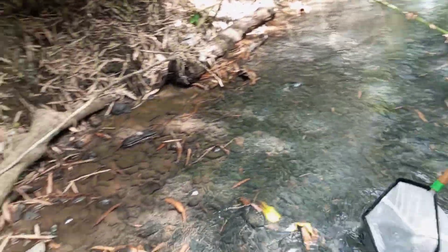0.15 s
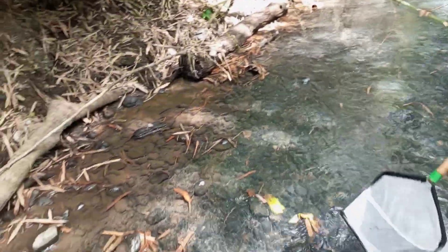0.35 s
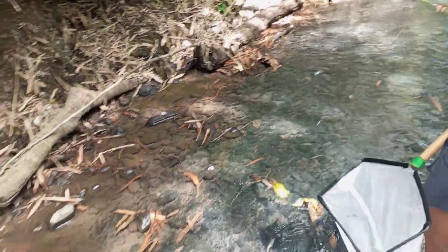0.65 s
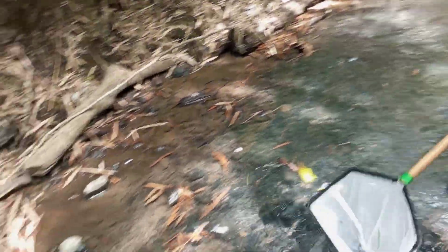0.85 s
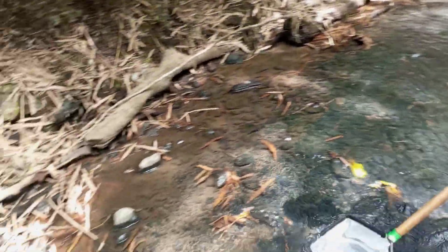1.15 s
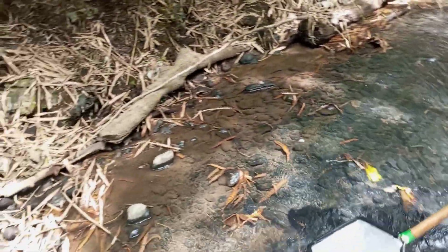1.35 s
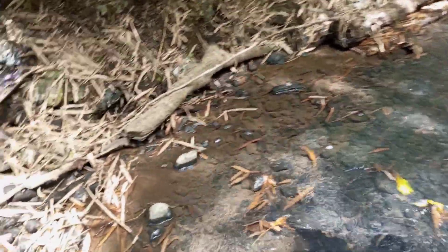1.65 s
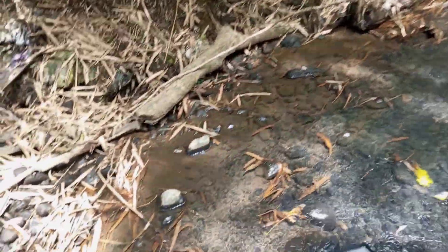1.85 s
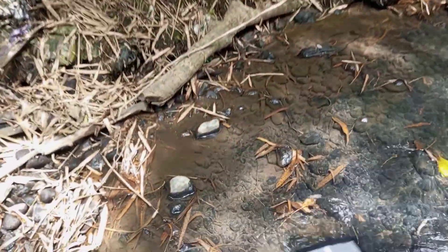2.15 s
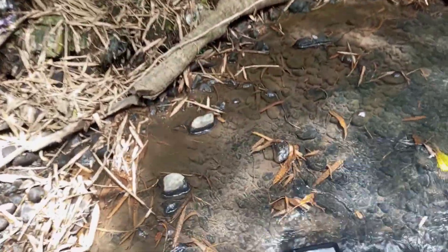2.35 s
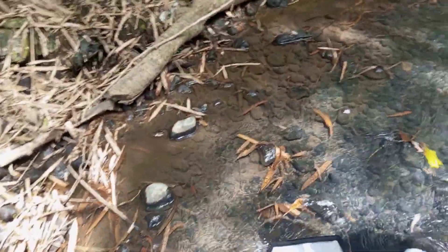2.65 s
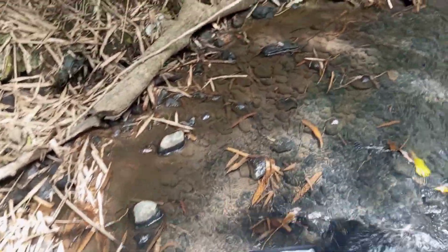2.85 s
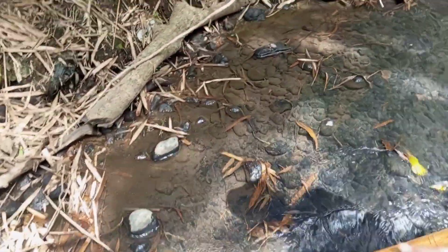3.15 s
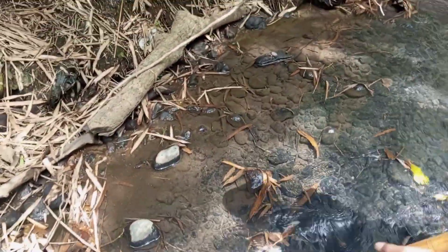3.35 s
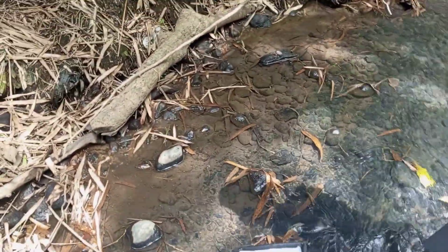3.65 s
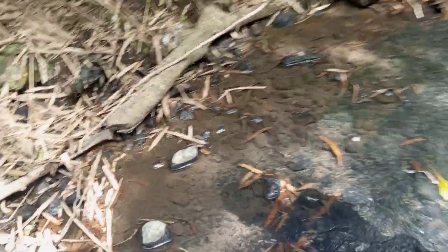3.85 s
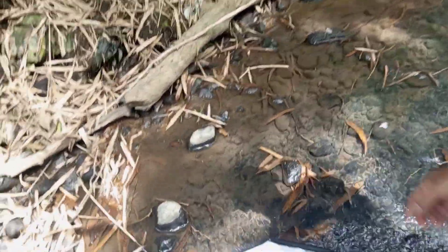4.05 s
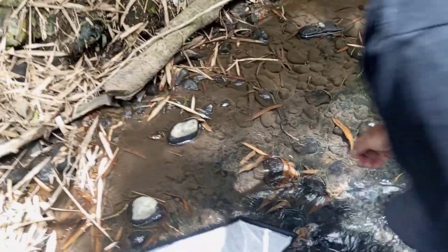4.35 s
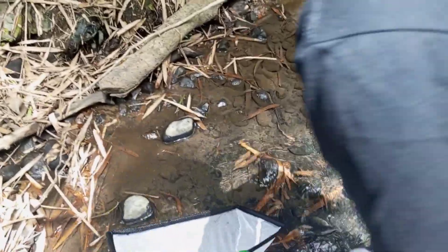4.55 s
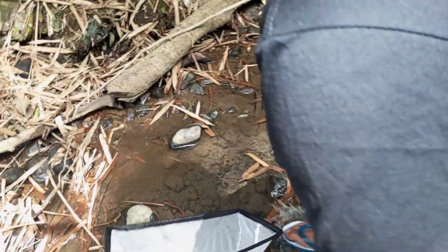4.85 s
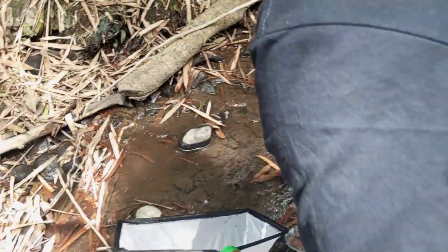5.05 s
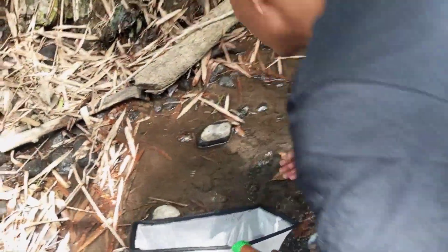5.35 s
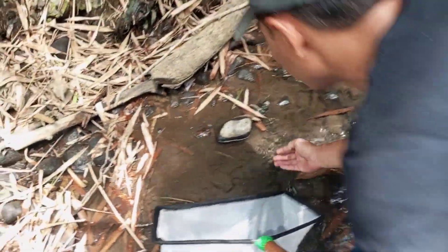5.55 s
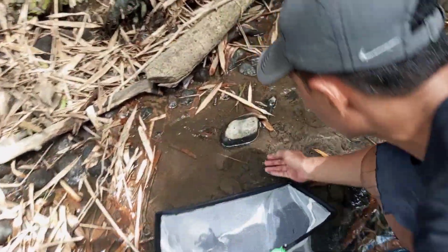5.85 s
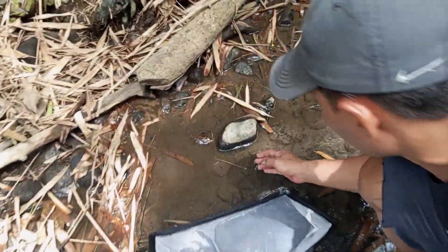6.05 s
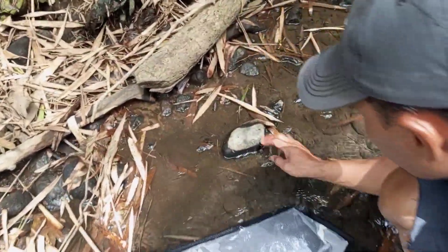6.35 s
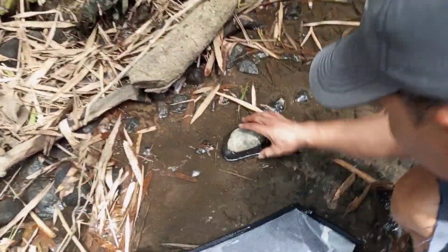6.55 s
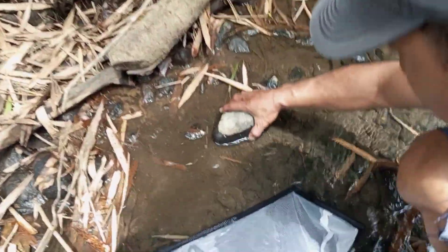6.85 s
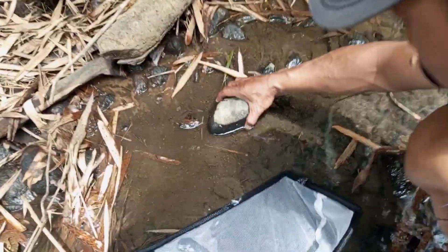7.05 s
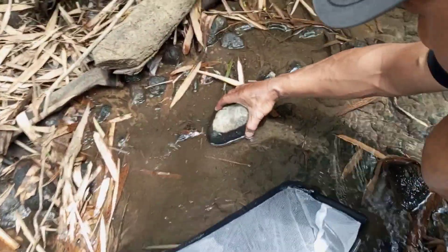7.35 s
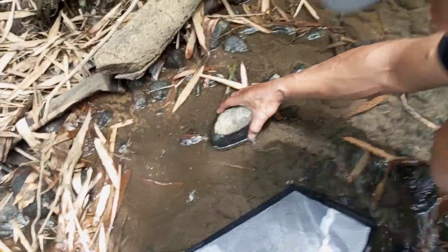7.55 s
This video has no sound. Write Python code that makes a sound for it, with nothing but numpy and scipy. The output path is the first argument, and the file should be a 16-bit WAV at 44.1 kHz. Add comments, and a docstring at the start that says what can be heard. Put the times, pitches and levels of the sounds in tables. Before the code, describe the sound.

Close, irregular wading steps slosh through the shallows of a stream among trees, each with plops, drips and a brief fizz. A bird nearby chirps twice at the start, once midway and twice more as the wading stops, each note short and falling. For the last two seconds there is mostly the soft, steady hiss of the water, with smaller birds barely audible far away.

```python
"""A stream hisses throughout. First a near bird gives two falling chirps that echo in the trees.
Then someone wades through the shallows with a hand net: each step traps air pockets that resonate as
bubbles, throws spray and leaves a fizz. The bird chirps once amid the steps and twice as they end,
after five seconds. Last, smaller birds call far off, heard by their reverberation alone."""
import sys
import numpy as np
from scipy import signal
from scipy.fft import rfft, irfft, next_fast_len
from scipy.io import wavfile
from scipy.ndimage import uniform_filter1d, map_coordinates

SR = 44100
rng = np.random.default_rng(int(sys.argv[2]) if len(sys.argv) > 2 else 0)


def wav_out(sig):
    """Save sig, one row per channel (or a flat mono array), as 16-bit PCM at SR to the path in sys.argv[1]."""
    wavfile.write(sys.argv[1], SR, np.round(np.clip(np.atleast_2d(sig).T, -1, 1) * 32767).astype(np.int16))


N = 339570


def wading():
    """Superposition: single bubbles and drops stand out of the gurgle and spray that the legs stir up."""
    rings, slaps = drop_impacts()
    gurgle_db, spray_db = stirring()
    gurgle = amp(gurgle_db - 9.5) * bubble_cloud(4500, hz=1200, spread=.55, cycles=30, scatter_db=1.1)
    droplet_db = 1.576 * spray_db + 27.5  # droplets grow faster than foam with harder stirring
    droplets = amp(droplet_db) * bubble_cloud(2200, hz=5200, spread=.3, cycles=30, scatter_db=1.6)
    return air_pockets() + rings + gurgle + droplets + spray(spray_db, slaps + sloshes())


def bubble(hz, t60, rise, attack):
    """Minnaert resonance: trapped air rings as a damped sine, its pitch climbing as it nears the surface."""
    age = np.arange(int(t60 * SR) + 2) / (t60 * SR)
    envelope = (1 - np.exp(-(age / attack) ** 2)) * amp(-60 * age)
    return np.sin(2 * np.pi * hz * t60 * age * (1 + rise * age)) * envelope / envelope.max()


def air_pockets():
    """Free oscillation: each air pocket closed by a foot or the net rings at its natural frequency."""
    # bubbles (time [s], peak level [dB], pitch [Hz], t60 [s])
    pockets = [(.149, -49.5, 1236, 0.057), (.155, -57.5, 497, 0.15), (.367, -46.5, 1210, 0.015),
               (.81, -48.5, 2200, 0.014), (0.893, -53, 340, .042), (.957, -50.5, 1430, 0.027),
               (.958, -56.5, 3370, 0.037), (.998, -50, 352, .026), (.999, -46.5, 3150, 0.0068),
               (1.016, -54, 1235, 0.042), (1.074, -47, 2330, 0.021), (1.162, -47, 1740, 0.0093),
               (1.256, -45, 3050, 0.0043), (1.265, -35.5, 1850, 0.0074), (1.275, -27, 366, 0.051),
               (1.317, -54, 560, 0.062), (1.335, -54.5, 680, 0.045), (1.729, -42.5, 780, 0.051),
               (1.732, -43, 2490, 0.011), (1.743, -41.5, 1180, 0.026), (1.752, -24.5, 1780, 0.0048),
               (1.771, -47, 2720, .016), (1.784, -50, 836, .048), (1.787, -27, 2670, 0.01),
               (1.789, -36.5, 1520, 0.0098), (1.905, -47.5, 1520, .046), (2.169, -52, 837, 0.067),
               (2.33, -40, 976, .038), (2.345, -23, 1554, 0.011), (2.378, -41.5, 2170, .014),
               (2.407, -42, 2270, .009), (2.409, -38.5, 1410, .012), (2.428, -42.5, 1770, 0.019),
               (2.43, -51, 710, 0.041), (2.534, -46.5, 1805, .042), (2.776, -46.5, 2180, 0.024),
               (2.796, -51, 2220, .02), (2.925, -52, 625, 0.051), (2.979, -39, 326, 0.069),
               (2.98, -45.5, 990, .018), (3.002, -49, 930, 0.038), (3.099, -49.5, 2070, .018),
               (3.13, -42.5, 2070, 0.021), (3.331, -41, 2100, .019), (3.407, -51.5, 696, 0.036),
               (3.539, -49, 441, .13), (3.568, -40, 1004, .018), (3.575, -45, 610, .031),
               (3.58, -41, 357, 0.077), (3.62, -41.5, 2590, .01), (3.621, -44.5, 2050, 0.02),
               (3.633, -44.5, 1640, .024), (3.652, -26.5, 377.6, 0.05), (3.678, -49, 1186, .044),
               (3.693, -45, 2530, .012), (3.704, -50, 1116, 0.036), (3.713, -46.5, 1596, .025),
               (3.719, -50, 456, 0.034), (3.763, -47, 1420, .023), (3.798, -44.5, 1340, 0.032),
               (3.815, -44, 1570, .017), (3.821, -55, 594, 0.14), (3.842, -48, 1236, 0.067),
               (3.86, -34.5, 1730, 0.011), (3.873, -52, 1830, .028), (3.892, -48, 433, 0.053),
               (3.925, -42, 1305, .011), (3.943, -47, 1130, .018), (3.946, -43, 1710, .013),
               (3.958, -45, 1890, .012), (4.039, -56.5, 500, .072), (4.576, -48, 1590, 0.019),
               (4.612, -41.5, 424, 0.045), (4.627, -41, 370, 0.087), (4.631, -46, 1084, .034),
               (4.646, -47.5, 1050, 0.053), (4.665, -44, 1400, .017), (4.682, -53, 423, .074),
               (4.694, -55, 632, 0.15), (4.732, -45.5, 660, 0.033), (4.748, -49, 1040, .029),
               (4.754, -42.5, 228, 0.054), (4.767, -47.5, 406, 0.13), (4.771, -49, 2060, 0.013),
               (4.786, -36.5, 2080, 0.0077), (4.805, -52, 1580, 0.028), (4.806, -46, 976, 0.039),
               (4.826, -45, 1200, .014), (4.875, -50, 3010, .014), (4.882, -43.5, 788, 0.068),
               (4.891, -46, 1300, 0.017), (4.904, -44, 2100, .009), (4.93, -48, 910, .026),
               (4.986, -51, 1750, 0.043), (5.004, -40.5, 2850, 0.0059), (5.009, -47, 710, .08),
               (5.018, -47, 2930, .01), (5.051, -51, 740, 0.037), (5.093, -51, 2520, .016),
               (5.167, -51, 934, 0.07), (5.184, -53, 375, .039), (6.161, -56, 240, 0.034),
               (7.374, -55.5, 718, 0.036), (7.375, -54.5, 435, .026), (7.675, -57, 387, .077)]
    out = np.zeros(N)
    for s, db, hz, t60 in pockets:
        add(out, s, amp(db) * bubble(hz, max(t60, .005), rise=.12, attack=.1))
    return out


def drop_impacts():
    """Impact excitation: a drop makes a broadband slap and a ring, which is shorter under a harder slap."""
    # drops hitting the water (time [s], peak level [dB], ring pitch [Hz], slap re ring [dB])
    drops = [(.33, -50, 5470, 4), (.515, -50.5, 8100, 3), (0.605, -50, 4900, 3), (.8127, -36.5, 7200, -6),
             (.96, -51, 5100, 1), (0.999, -55, 7000, 2), (1.0135, -54, 8500, 0), (1.029, -53, 8450, 0),
             (1.0848, -49.5, 4700, -14), (1.1603, -45, 5760, 1), (1.1737, -48, 4930, 0),
             (1.2436, -47, 6100, -4), (1.2537, -54, 5600, 6), (1.6104, -48, 5900, -12),
             (1.705, -45, 4320, 0), (1.7145, -47, 4700, -10), (1.725, -49, 5900, -10),
             (1.7548, -32, 4000, -5), (1.7629, -35, 4200, -1), (1.7713, -36, 6370, -10),
             (1.7838, -35, 5930, 7), (1.7916, -25, 4800, -1.5), (1.798, -38, 9800, -11),
             (1.809, -38, 4270, -5), (1.8188, -42, 4100, 2), (1.8265, -38, 5860, -6),
             (2.3056, -38.5, 6200, -10), (2.3271, -28, 6600, -1.5), (2.3273, -31.5, 5650, 7),
             (2.345, -29.5, 6260, 1.5), (2.358, -43, 4700, -8), (2.4098, -31, 6320, 3),
             (2.425, -41, 6950, 2), (2.7823, -44.5, 5500, -7), (2.975, -52, 4400, -5),
             (3.086, -51, 9050, -16), (3.226, -52, 5960, -12), (3.6208, -56, 6300, 3),
             (3.709, -44.5, 3560, -10), (3.715, -44, 8900, -10), (3.7913, -49, 8550, -10),
             (4.154, -56, 6950, -16), (4.6, -44.5, 4240, -6), (4.6142, -47, 4270, -12),
             (4.714, -37.5, 5040, -19), (4.8107, -53, 9300, -10), (4.848, -48, 6600, 7),
             (4.9077, -55.5, 8800, 6), (4.944, -38.5, 6600, -7), (5.002, -41, 5300, -21),
             (5.096, -42, 7500, 4), (5.1029, -23.5, 5780, -2), (5.119, -42, 4500, -7),
             (5.1522, -46, 9350, -3), (5.1553, -45, 6000, -7)]
    ring_t60_s, slap_damping, slap_rise_s = 0.0034, 0.57, 0.00032
    rings, slaps = np.zeros(N), np.zeros(N)
    t = np.arange(SR // 25) / SR
    burst = amp(-60 * t / 0.0049) + amp(-5 - 60 * t / 0.031)  # the slap, then its spatter
    burst *= 1 - np.exp(-t / slap_rise_s)
    for s, db, hz, slap_db in drops:
        t60 = ring_t60_s * amp(-slap_damping * slap_db)
        add(rings, s, amp(db) * bubble(hz, t60, rise=.03, attack=.17))
        add(slaps, s, amp(db + slap_db) * burst * rng.standard_normal(len(t)))
    return rings, slaps


def sloshes():
    """Noise transients: sheets of water swell and fall exponentially."""
    # sheets of water (crest time [s], level [dB])
    sheets = [(.815, -55), (1.002, -53), (1.083, -55), (1.163, -48), (1.263, -50), (1.611, -60),
              (1.762, -54), (1.791, -31), (2.409, -38), (2.779, -61), (2.981, -57), (3.622, -46.5),
              (3.712, -52), (4.831, -53), (5.006, -56), (5.115, -44)]
    rise_20db_s, t60_s = 0.0093, 0.035
    out = np.zeros(N)
    t = np.arange(-SR // 10, SR // 4) / SR  # zero at the crest
    envelope_db = np.where(t < 0, 20 * t / rise_20db_s, -60 * t / t60_s)
    for s, db in sheets:
        add(out, s + t[0], amp(db + envelope_db) * rng.standard_normal(len(t)))
    return out


def stirring():
    """Exponential relaxation: gurgle and spray levels climb with each stir, then settle to calm water."""
    # strokes of legs and net (crest time [s], relative gurgle [dB], relative spray [dB], t60 [s])
    stirs = [(.17, -51.5, -65, 0.43), (.39, -56, -68, 0.28), (1.03, -57.5, -67, 0.16),
             (1.3, -53.5, -58, 0.52), (1.59, -49, -54.5, 0.52), (1.76, -45.5, -50, 0.29),
             (2.19, -50, -66, 0.17), (2.42, -48, -54, 0.22), (2.75, -56.5, -59.5, 0.97),
             (3.0, -46.5, -64, 0.11), (3.58, -42.5, -54.5, 0.98), (3.92, -50, -61.5, 1.0),
             (4.648, -43.5, -55.5, 0.64), (4.87, -49.5, -62, 0.71), (5.02, -55, -55.5, 0.71),
             (5.19, -53.5, -61, .2)]
    rise_db_per_s, calm_gurgle_db, calm_spray_db, hop = 160, -61.5, -65.5, 64
    s, gurgle_db, spray_db, t60 = np.transpose(stirs)[:, :, None]
    t = np.arange(0, N, hop) / SR - s
    envelope_db = np.where(t < 0, rise_db_per_s * t, -60 * t / t60)

    def level(crest_db, calm_db):
        strongest_db = (crest_db + envelope_db).max(axis=0)
        return np.repeat(np.maximum(strongest_db, calm_db), hop)[:N]
    return level(gurgle_db, calm_gurgle_db), level(spray_db, calm_spray_db)


def spray(spray_db, splashes):
    """Source and filter: unevenly bursting foam and the splashes share one bright spectrum."""
    # spray spectrum (frequency [Hz], gain [dB])
    spectrum = [(1200, -43), (2000, -16), (3400, -13.5), (4300, -9.5), (6500, -4.5), (7900, -9.5),
                (9700, -10.5), (13000, -6.5), (16700, -6.5)]
    foam = unit(rng.standard_normal(N) * amp(3.6 * wobble(300)))
    filter_gain = np.std(coloured(foam, spectrum))
    return coloured(amp(spray_db - 7) * foam + splashes, spectrum) / filter_gain


def bubble_cloud(count, hz, spread, cycles, scatter_db):
    """Incoherent summation: small bubbles of random onset and log-normal pitch merge, scaled to rms 1."""
    out = np.zeros(N)
    for when, pitch, size in zip(rng.random(count), rng.standard_normal(count), rng.exponential(1, count)):
        f = min(hz * np.exp(spread * pitch), 15000)
        add(out, when * N / SR, amp(scatter_db * size) * bubble(f, cycles / f, rise=.11, attack=.11))
    return unit(out)


def near_bird():
    """Multipath propagation: each falling chirp arrives directly, then as delayed echoes."""
    # chirps (time [s], level [dB], first pitch [Hz], last pitch [Hz], length [s],
    # lateness of the fall [exponent], crest position [0-1], tree echo re call [dB])
    chirps = [(0.084, -39.5, 2557, 2030, 0.069, 1.1, 0.4, -5.5),
              (0.427, -42, 2704, 1974, 0.069, 0.99, 0.38, -0.5),
              (3.204, -45, 2598, 2095, 0.041, .8, 0.38, 5),
              (5.159, -52.5, 2413, 2204, 0.049, 1.04, 0.63, -1.5),
              (5.472, -36.5, 2550, 2090, .056, 1.93, 0.6, -11.5)]
    out = np.zeros(N)
    for s, db, first_hz, last_hz, length, bend, crest, echo_db in chirps:
        call = amp(db) * whistle(first_hz, last_hz, length, crest, wobble_hz=30, bend=bend, swell=1.74)
        add(out, s, call * amp(3.4 * wobble(202, size=len(call))))  # the throat flutters
        add(out, s + 0.0216, amp(echo_db - 5.5) * call)  # the near bank's reflection beats with it
        add(out, s + 0.0049, amp(echo_db) * tree_echo(call))
        add(out, s + 0.063, amp(echo_db - 7.5) * tree_echo(call))  # the far slope answers later
    return out


def far_birds():
    """Diffuse field: thin, distant calls hovering on one pitch arrive as scattered sound alone."""
    # calls (time [s], level [dB], pitch [Hz], length [s], pitch wobble [Hz], crest position [0-1])
    calls = [(5.89, -67, 2200, .15, 20, .4), (5.96, -65, 7050, .28, 380, .25),
             (7.17, -67, 6050, .2, 270, .3), (7.12, -62, 1460, .52, 70, .75)]
    out = np.zeros(N)
    for s, db, hz, length, wobble_hz, crest in calls:
        call = amp(db) * whistle(hz, hz, length, crest, wobble_hz, bend=1, swell=0.51)
        add(out, s, tree_echo(call))
    return out


def whistle(first_hz, last_hz, length, crest, wobble_hz, bend, swell):
    """Frequency modulation: a wavering sine lingers at both ends of its glide, under a single swell."""
    age = np.arange(int(length * SR)) / (length * SR)
    glide = np.sin(np.pi / 2 * age ** bend) ** 2
    hz = first_hz + (last_hz - first_hz) * glide + wobble_hz * wobble(140, size=len(age))
    skew = np.log(.5) / np.log(np.clip(crest, .1, .9))
    envelope = np.sin(np.pi * age ** skew) ** swell
    return np.sin(2 * np.pi * np.cumsum(hz) / SR) * envelope


def bank_echo(sound):
    """Time-varying reflection: the response of the banks changes as the wader moves."""
    # reverberation of the banks (frequency [Hz], t60 [s])
    decays = [(300, 0.094), (2000, 0.16), (8000, 0.054)]
    out, block, delay_s = np.zeros(N), SR // 4, .004
    for start in range(0, N, block):
        echo = signal.fftconvolve(sound[start:start + block], impulse_response(decays))
        add(out, start / SR + delay_s, echo)
    return out


def tree_echo(call):
    """Scattering: the trunks spread a call out in time, with its energy kept."""
    # reverberation of the trees (frequency [Hz], t60 [s])
    decays = [(300, 0.1), (2500, 0.34), (8000, 0.12)]
    wet = signal.fftconvolve(call, impulse_response(decays))
    return wet * np.linalg.norm(call) / np.linalg.norm(wet)


def impulse_response(decays):
    """Absorption: in a random echo tail of unit energy, each frequency dies at its own rate."""
    hz, t, bins = signal.stft(rng.standard_normal(SR // 2), SR, nperseg=256)
    tail = signal.istft(bins * amp(-60 * t / along(decays, hz)[:, None]), SR, nperseg=256)[1]
    return tail / np.linalg.norm(tail)


def stream():
    """Incoherent summation: countless far ripples blur to a patchy hiss over a low rumble."""
    # hiss of the water, swelling twice as the wader stirs it (time [s], level [dB])
    hiss_levels = [(0, -61), (2.85, -61.5), (3.6, -60), (3.75, -57.5), (4.14, -61), (4.61, -61),
                   (4.78, -55.5), (5.28, -61.5), (7.06, -63), (7.7, -64.5)]
    # ripple spectrum (frequency [Hz], gain [dB])
    hiss_spectrum = [(120, -34.5), (200, -3), (400, -3.5), (600, -9.5), (1000, -6), (1900, -3),
                     (3500, -7.5), (6200, -11.5), (7000, -12), (7900, -17), (9500, -16), (11200, -19),
                     (13200, -7.5), (16700, -32.5)]
    # rumble spectrum (frequency [Hz], gain [dB])
    rumble_spectrum = [(15, -85), (25, -28), (40, -15.5), (71, 3), (166, 3), (222, -8.5), (260, -10.5),
                       (340, -32.5), (570, -120)]
    hiss_db = np.interp(np.arange(N) / SR, *np.transpose(hiss_levels))
    bins = signal.stft(rng.standard_normal(N), nperseg=512)[2]
    patches = uniform_filter1d(rng.standard_normal(bins.shape), 5, axis=0)  # smooth in frequency
    patches = uniform_filter1d(patches, 10, axis=1)  # and in time
    noise = signal.istft(bins * amp(2.17 * unit(patches)), nperseg=512)[1][:N]
    ripples = bubble_cloud(600, hz=1500, spread=.7, cycles=22, scatter_db=1.5)
    hiss = unit(coloured(noise, hiss_spectrum)) + amp(-15.5) * ripples
    rumble = unit(coloured(rng.standard_normal(N), rumble_spectrum))
    rumble *= amp(1.1 * wobble(7) + 2.5 * wobble(16))
    return amp(hiss_db + 0.17 * wobble(3.76)) * hiss + amp(-69) * rumble


def amp(db):
    """Decibels to amplitude."""
    return 10 ** (np.asarray(db) / 20)


def unit(x):
    """Normalisation to rms 1."""
    return x / np.sqrt(np.mean(x ** 2) + 1e-20)


def along(points, hz):
    """Interpolation on a log frequency axis."""
    f, values = np.transpose(points)
    return np.interp(np.log(hz + 1), np.log(f + 1), values)


def wobble(rate, size=N):
    """Smooth random modulation, rate knots a second."""
    knots = rng.standard_normal(int(size * rate / SR) + 4)
    return map_coordinates(knots, [np.arange(size) * rate / SR])


def coloured(x, spectrum):
    """Minimum-phase filtering: folding the cepstrum makes the response causal."""
    m = next_fast_len(N + 8192, True)
    gain = amp(along(spectrum, np.fft.rfftfreq(m, 1 / SR)))
    cepstrum = irfft(np.log(gain + 1e-6), m)
    cepstrum[1:m // 2] *= 2
    cepstrum[m // 2 + 1:] = 0
    return irfft(rfft(x, m) * np.exp(rfft(cepstrum)), m)[:N]


def add(track, s, sound):
    """Superposition of a sound at s seconds."""
    part = track[round(s * SR):][:len(sound)]
    part += sound[:len(part)]


def scene():
    """Superposition: the wader, the banks' echo, the birds and the stream sum in one channel."""
    wader = wading()
    return (wader + amp(-8) * bank_echo(wader) + near_bird() + far_birds() + stream())[None]


def record(dry):
    """Port resonance: the microphone dips in the high treble and rings above it, below a band limit."""
    # microphone response (frequency [Hz], gain [dB])
    response = [(20, -1), (7000, 2), (9700, -4), (11300, -19.5), (12700, -23.5), (13500, -34),
                (14900, -6.5), (15700, -16.5), (15900, -28), (22050, -55)]
    top_hz = 16800
    m = next_fast_len(N + 4096)
    passband = np.fft.rfftfreq(m, 1 / SR) < top_hz
    return irfft(rfft(coloured(dry[0], response), m) * passband, m)[None, :N]


dry = scene()
out = record(dry)
wav_out(out)
```